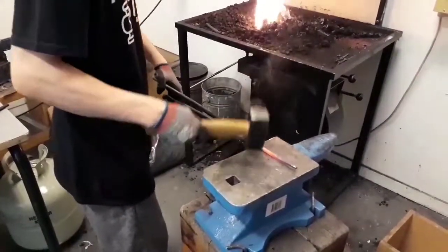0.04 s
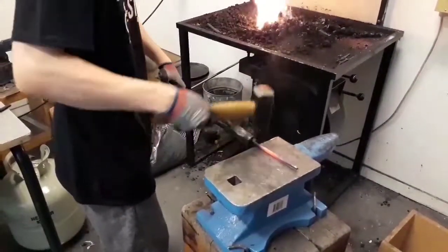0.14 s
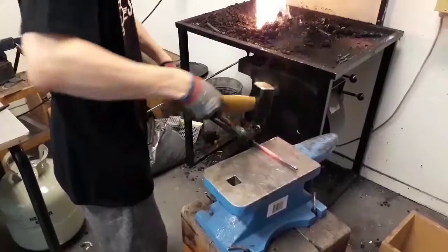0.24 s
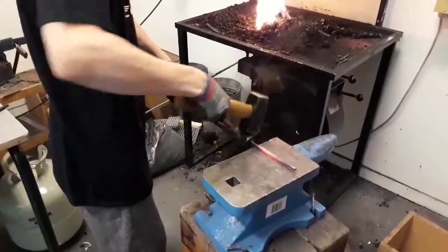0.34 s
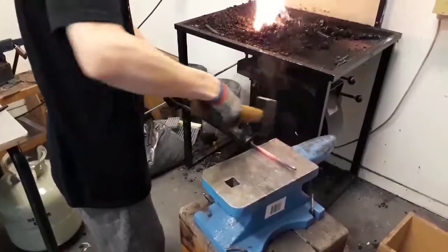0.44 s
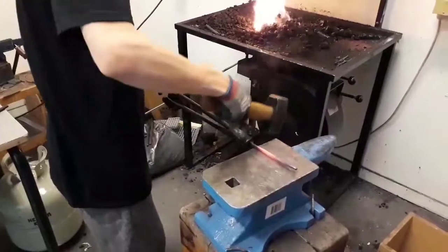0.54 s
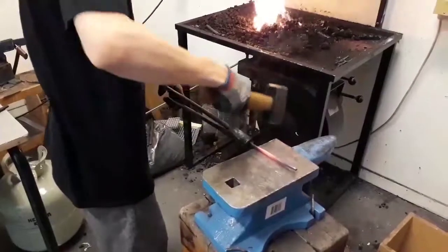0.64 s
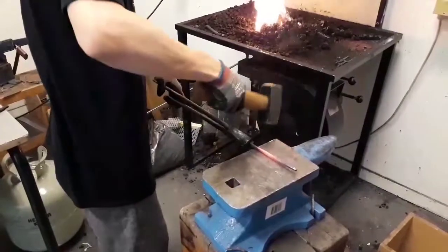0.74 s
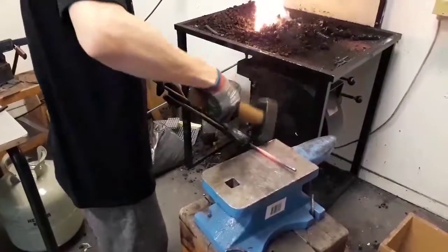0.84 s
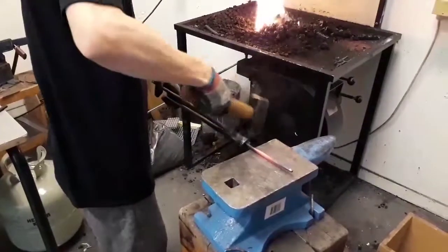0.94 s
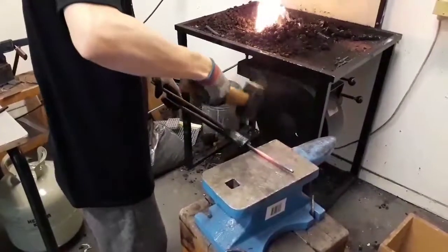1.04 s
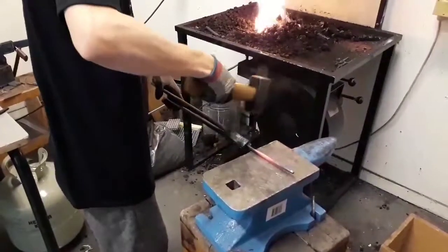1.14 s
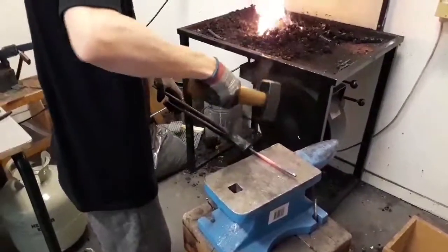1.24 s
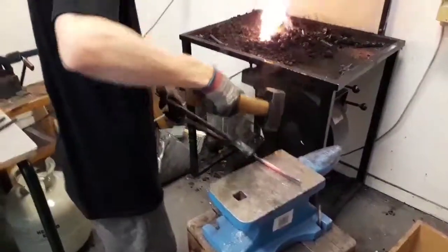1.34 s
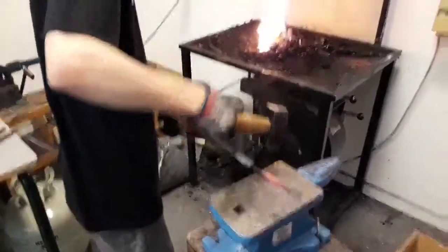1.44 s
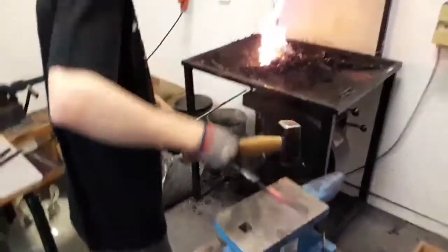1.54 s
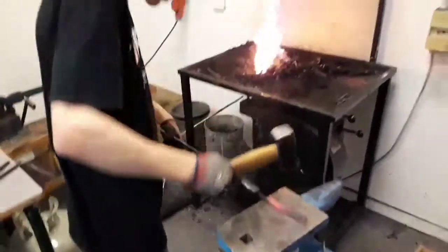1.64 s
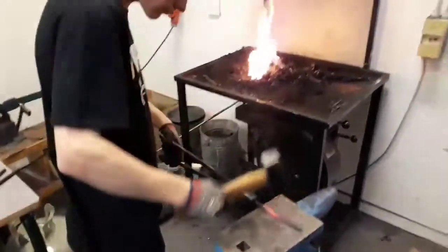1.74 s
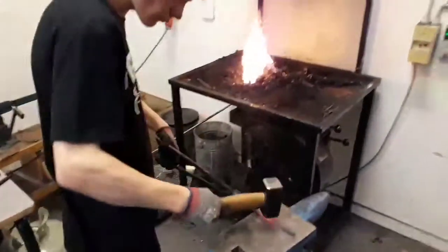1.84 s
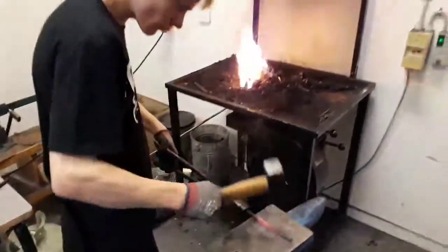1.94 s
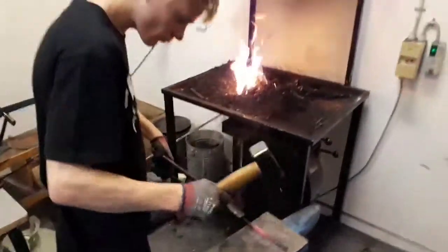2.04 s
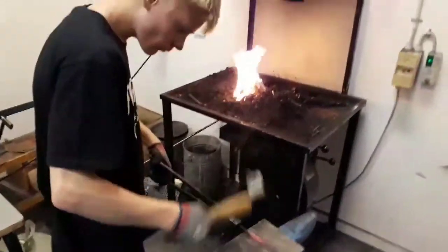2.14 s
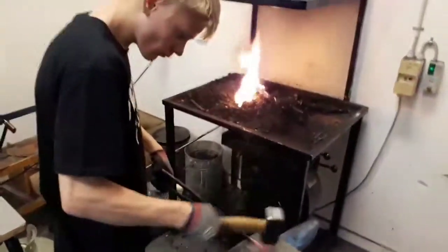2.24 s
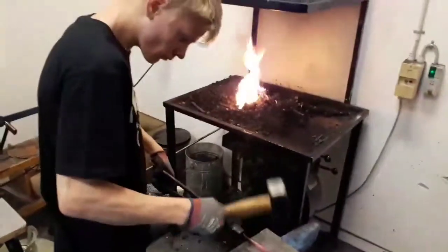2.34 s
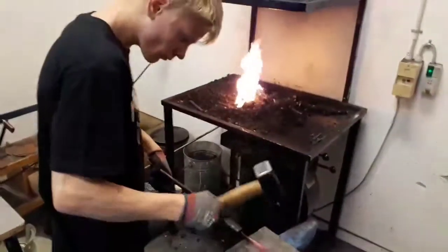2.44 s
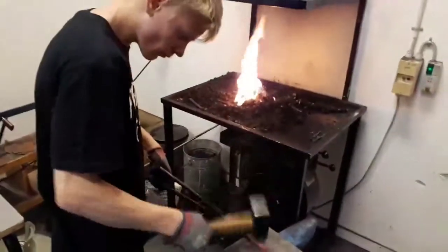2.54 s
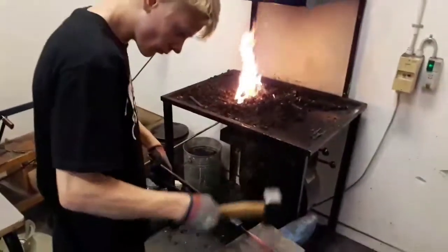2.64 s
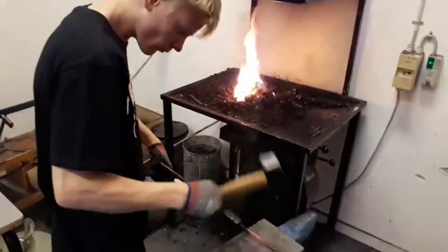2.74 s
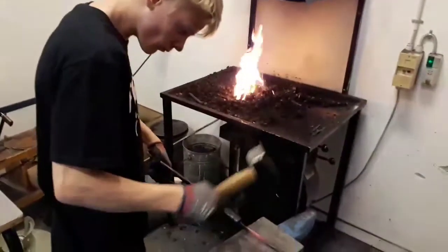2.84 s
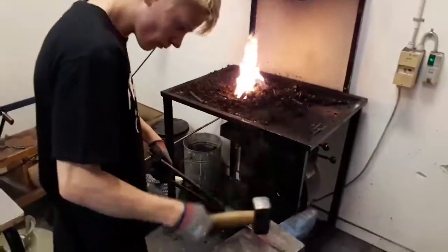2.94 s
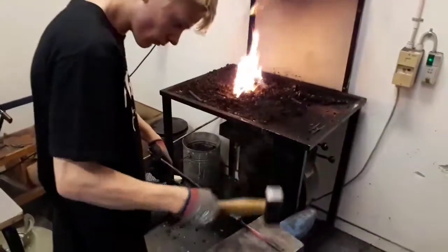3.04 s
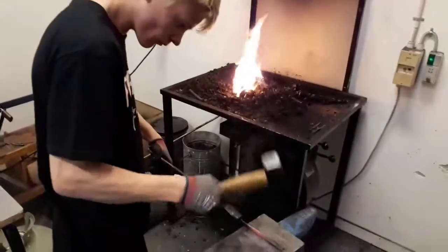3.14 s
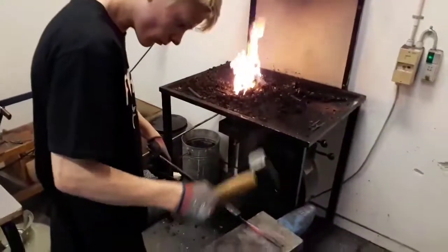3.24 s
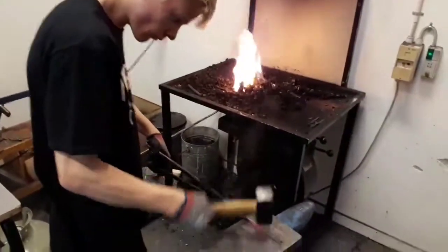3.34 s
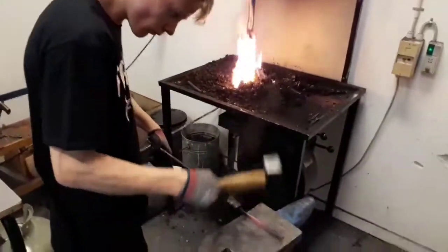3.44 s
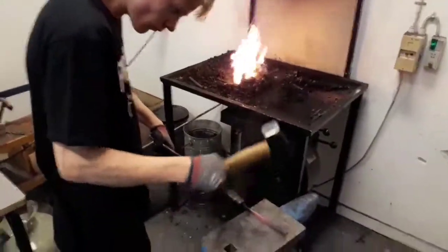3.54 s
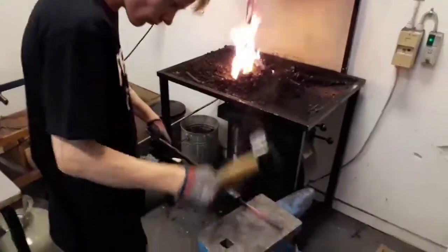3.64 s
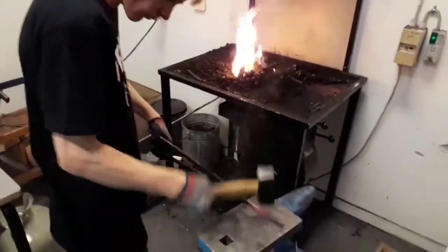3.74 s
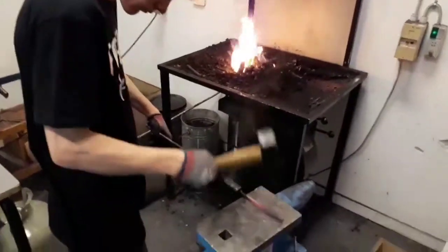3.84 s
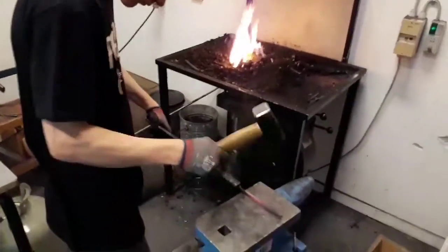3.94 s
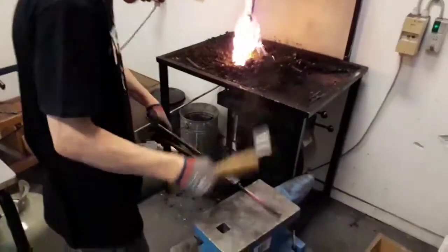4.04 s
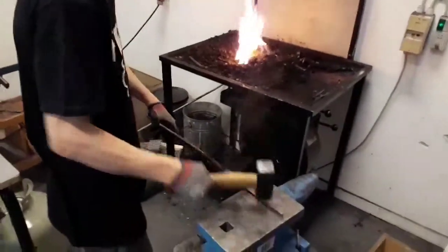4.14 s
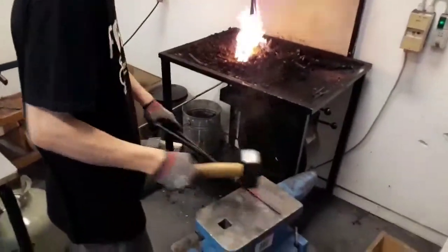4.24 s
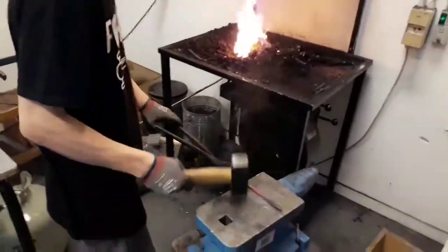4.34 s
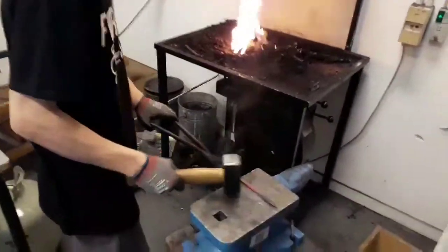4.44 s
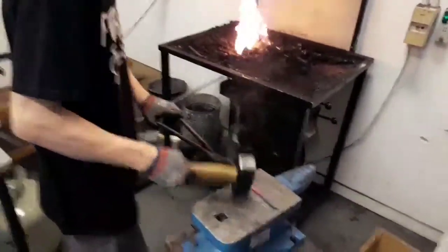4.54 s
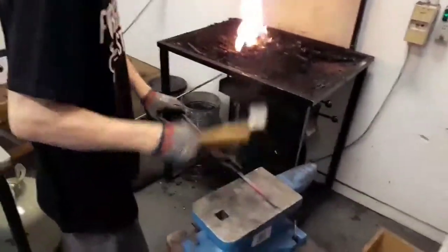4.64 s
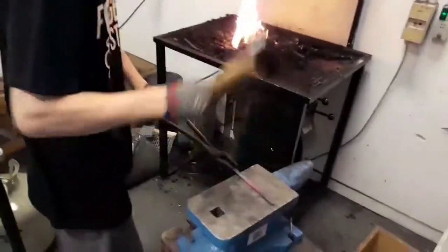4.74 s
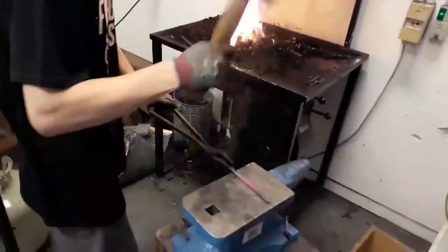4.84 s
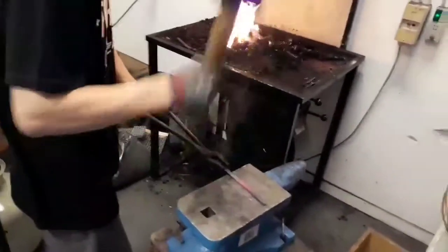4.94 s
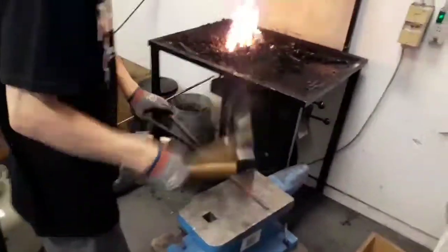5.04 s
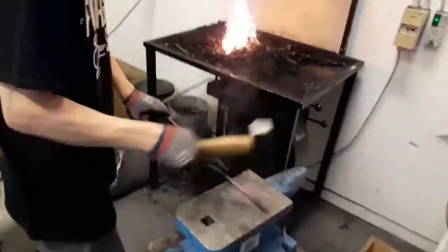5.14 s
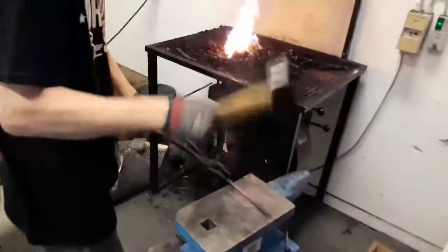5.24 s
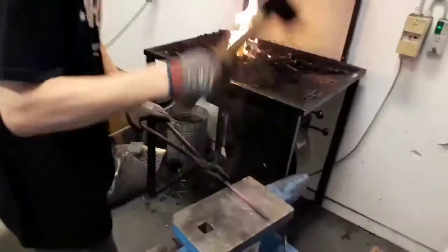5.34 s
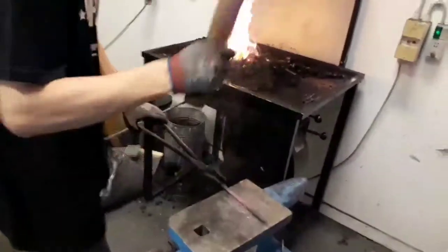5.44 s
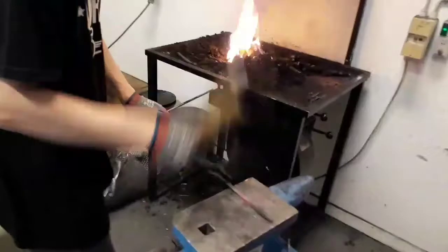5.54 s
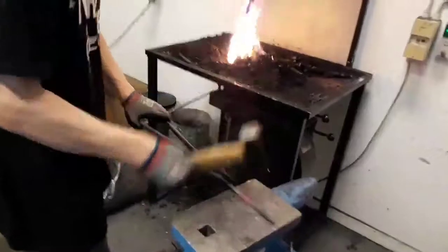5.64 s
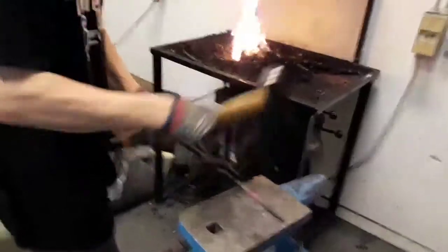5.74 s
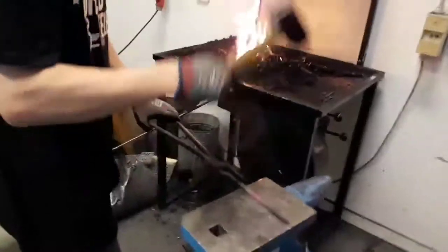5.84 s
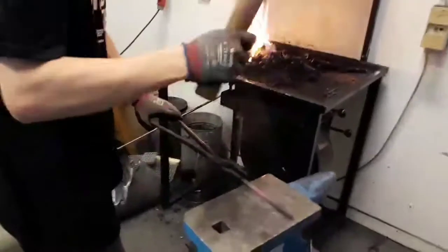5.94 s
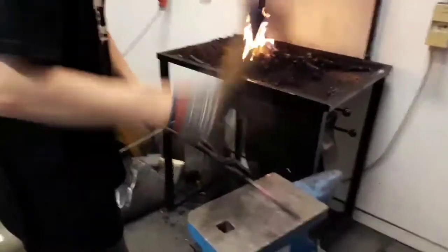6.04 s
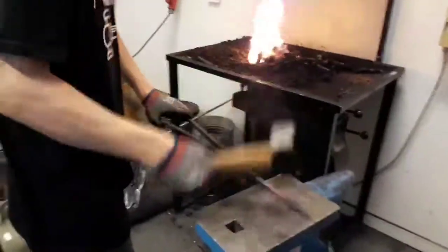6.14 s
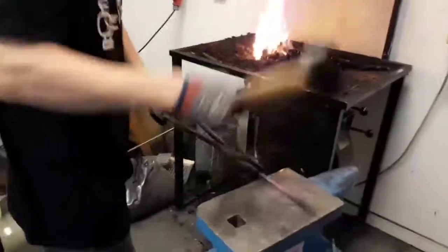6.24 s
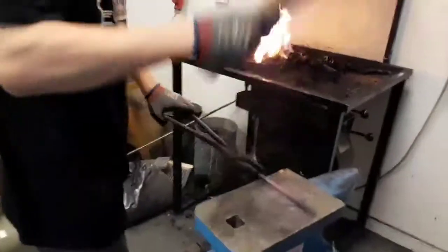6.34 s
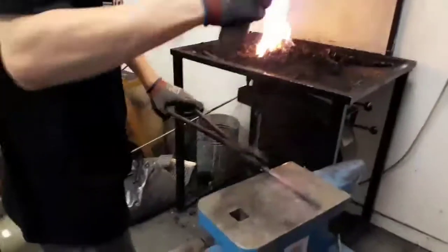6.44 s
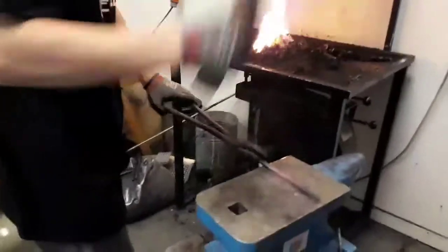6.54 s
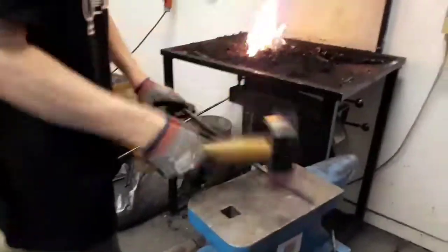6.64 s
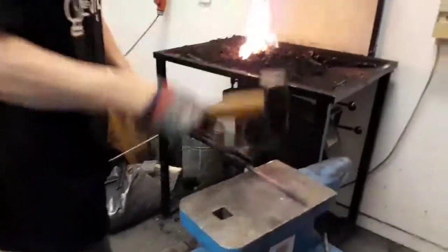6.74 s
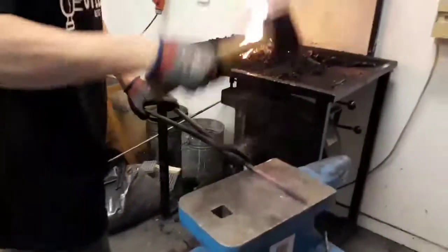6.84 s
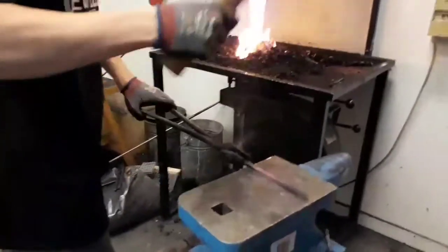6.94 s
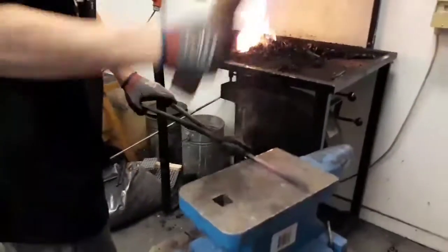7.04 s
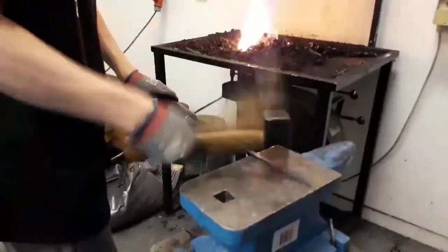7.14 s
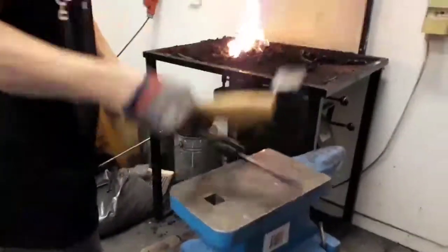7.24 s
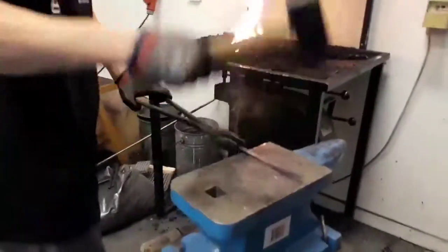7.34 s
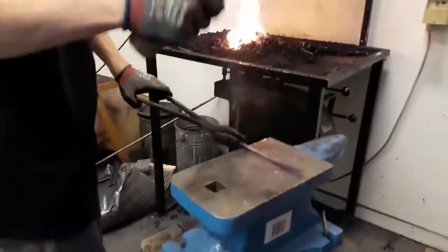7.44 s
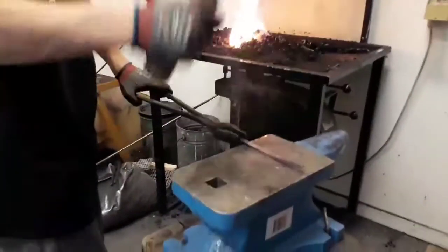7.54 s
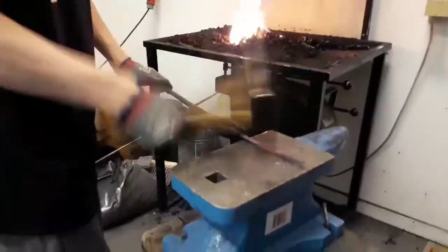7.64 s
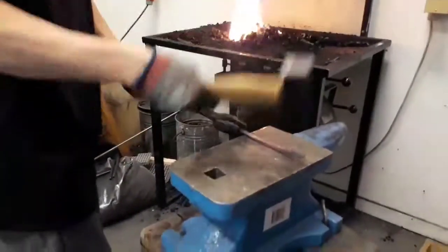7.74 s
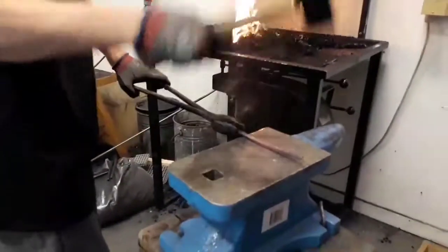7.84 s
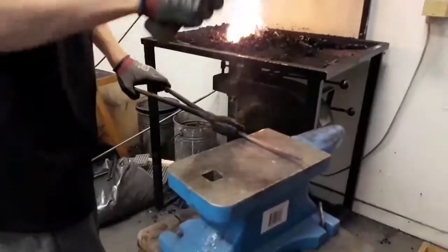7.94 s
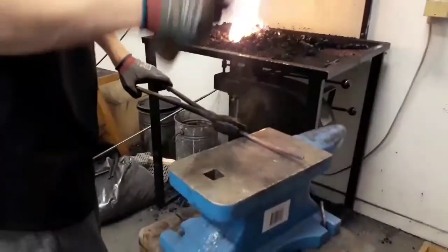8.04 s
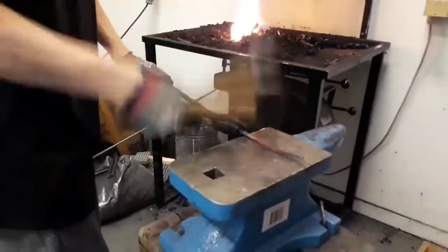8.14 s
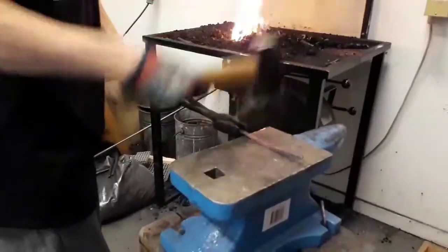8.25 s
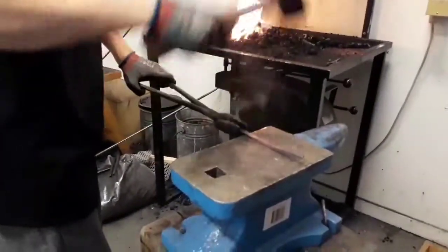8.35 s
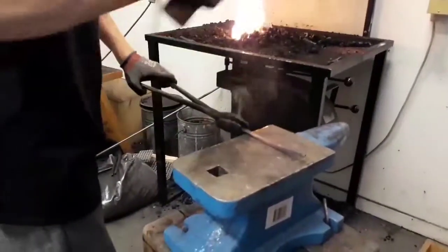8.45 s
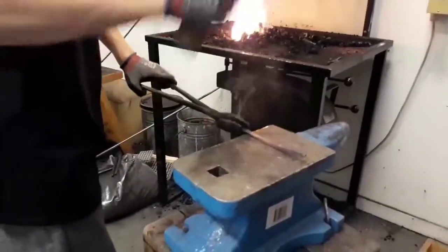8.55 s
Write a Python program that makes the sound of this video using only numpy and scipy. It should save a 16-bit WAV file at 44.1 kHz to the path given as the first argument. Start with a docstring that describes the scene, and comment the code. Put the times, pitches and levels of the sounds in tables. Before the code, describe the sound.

In a small hard-walled workshop, tongs click over a forge blower's hum, then a hammer strikes hot steel on an anvil in steady, strengthening blows.

```python
"""The tail of a hammer blow fades in a small hard-walled workshop; tongs click over a forge blower's hum.
Then a hand hammer strikes a hot bar on an anvil, blow after blow: noise that the room prolongs, with
short contact pulses, a thud from resonances of the stand and a ring from decaying anvil modes.
The blower is a mains tone, noise-driven housing resonances and air noise; a set curve, standing in for
a recorder's slow automatic gain, raises it in the pause and lowers it under the blows."""
import sys
import numpy as np
from scipy import signal
from scipy.io import wavfile

SR = 44100
rng = np.random.default_rng(int(sys.argv[2]) if len(sys.argv) > 2 else 0)


def to_wav(s):
    """Save 16-bit WAV."""
    ch = np.atleast_2d(s).T  # columns
    pcm = np.round(np.clip(ch, -1, 1) * 32767)  # PCM
    wavfile.write(sys.argv[1], SR, pcm.astype(np.int16))


N = 378819
LEAD = SR // 2   # run-in before the start, in samples

# Hammer blows. Each row: start in seconds, body level in relative dB, thud and brightness in dB over
# the body, snap of the first instant in dB, anvil ring in relative dB, landing spot along and across
# the face (about -1 to 1), level of the highest ring in relative dB.
HAMMER_BLOWS = [(-0.16, -12, -16.5, -32, 1.8, -33, -0.4, -0.97, -58),
                (1.9583, -22, 3, 2, 7.8, -35.5, 0.26, 0.29, -33),
                (2.3349, -12.5, -3.5, -7, 1, -30, 0.49, 0.1, -29.5),
                (2.7060, -12.5, -8, -9, 3, -32, 1, -0.58, -46),
                (3.0784, -11, -11, -12, 5.5, -30, 0.58, -0.54, -56),
                (3.4641, -15, -9.5, -8, 7.8, -35.5, 0.23, -0.065, -35.5),
                (3.8528, -11.5, -14, -9, 7.4, -36.5, 0.92, -0.55, -29),
                (4.2375, -8.5, -17, -16, 8.4, -35.5, 0.6, 0.041, -43),
                (4.5230, -20.5, -10.5, -20, 6.9, -37.5, -1.03, -1.27, -60),
                (5.1992, 0, -21.5, -16, 1.8, -26.5, -0.24, 0.5, -48),
                (5.7403, -1, -22, -18.5, 1.5, -27, -0.28, 0.26, -27),
                (6.264, -2, -20.5, -12, 0.53, -27.5, -0.52, -0.0065, -30),
                (6.782, -5, -17, -13.5, 1.8, -30, -0.26, 0.52, -30.5),
                (7.2942, -1, -22, -17.5, 1.1, -30.5, -0.45, 0.44, -26.5),
                (7.7941, -11, -10.5, -6, 2, -31, -0.072, 0.66, -37),
                (8.2964, -8, -15, -6, 1.5, -31.5, -0.38, 1, -30)]
# Reverberation of the workshop. Each row: frequency in Hz, time to fall 60 dB in seconds.
ROOM_DECAY = [(60, 1), (200, 0.65), (600, 0.93), (2000, 0.79), (5000, 0.65), (10000, 0.38), (13000, 0.2),
              (16000, 0.41)]


def from_db(db):
    """Level to amplitude: 20 dB is a factor of ten."""
    return 10 ** (np.asarray(db) / 20)


def rms_one(x):
    """Normalise the effective value: scale to rms 1."""
    return x / np.sqrt(np.mean(x ** 2) + 1e-20)


def at_hz(points, hz):
    """Interpolate a spectrum linearly on a logarithmic frequency axis."""
    point_hz, value = np.array(points).T
    return np.interp(np.log(hz), np.log(point_hz), value)


def strikes(times, db):
    """Impulsive excitation: one sample of the given level at each time in seconds."""
    out = np.zeros(N + LEAD) + 1e-18
    out[np.round(np.asarray(times) * SR).astype(int) + LEAD] = from_db(db)
    return out


def dying(clicks, t60):
    """Exponential decay: each click starts an envelope that falls 60 dB in t60 seconds."""
    return signal.lfilter([1], [1, -from_db(-60 / (t60 * SR))], clicks)


def resonance(x, hz, width_hz):
    """Damped resonator: a pole pair whose bandwidth sets its decay, with gain 1 at the peak."""
    r = np.exp(-np.pi * width_hz / SR)
    feedback = [1, -2 * r * np.cos(2 * np.pi * hz / SR), r * r]
    return signal.lfilter(np.array([1, 0, -1]) * (1 - r * r) / 2, feedback, x)


def noise_bands():
    """Third-octave analysis of white noise, as (centre Hz, samples); neighbours are unrelated."""
    edges = 30 * 2 ** np.arange(0, 9.3, 1 / 3)
    white = rng.standard_normal((2, N + LEAD))
    bands = []
    for k, (low, high) in enumerate(zip(edges, edges[1:])):
        band_pass = signal.butter(2, [low, high], "band", fs=SR, output="sos")
        bands.append((np.sqrt(low * high), signal.sosfilt(band_pass, white[k % 2])))
    return bands


def impact(bands, times, db_at, colour, early_db, early_t60, build_cycles=0.77):
    """Room response to an impact: strong first reflections and a tail whose decay depends on frequency."""
    out = 0
    for hz, band in bands:
        level_db = db_at(hz) + at_hz(colour, hz)
        late = strikes(times, level_db)
        early = strikes(times, level_db + early_db)
        decay = dying(late, at_hz(ROOM_DECAY, hz)) + dying(early, early_t60)
        # The build-up lasts a fixed number of cycles, so lows take longer.
        out = out + band * (decay - dying(late + early, build_cycles / hz))
    return out


def crack(times, peak_db, hz):
    """Contact pulse: two or three cycles that swell and vanish, with peak 1 for 0 dB."""
    cycles = np.arange(int(3 * SR / hz)) * hz / SR
    swell = cycles * np.exp(1 - cycles / .8) / .8
    return signal.lfilter(np.sin(2 * np.pi * cycles) * swell, [1], strikes(times, peak_db))


def hardness():
    """Strength of impact read from the body level: 0 for a light blow, 1 for a full swing."""
    body_db = np.transpose(HAMMER_BLOWS)[1]
    return np.clip((body_db + 10) / 8, 0, 1)


def blower(bands):
    """Noise-driven resonance: a steady mains hum and wavering housing tones over broad air noise."""
    # Hum level, a set curve standing in for the recorder's slow automatic gain.
    # Each row: time in seconds, relative dB.
    gain_curve = [(0.0, -57.5), (0.69, -49), (1.29, -46), (2.05, -45), (2.68, -57), (3.11, -61),
                  (3.68, -63), (4.6, -59.5), (5.31, -56), (5.57, -61), (6.36, -62), (7.39, -62),
                  (8.59, -62.5)]
    # Air and flame spectrum. Each row: frequency in Hz, relative dB per Hz.
    air_spectrum = [(30, -53), (70, -59), (110, -12.5), (223, -4.5), (380, -18.5), (700, -15),
                    (1280, -16.5), (1450, -21.5), (2300, -21), (4500, -29.5), (7470, -29.5), (11000, -46),
                    (15200, -51), (16500, -60)]
    # Housing tones. Each row: frequency in Hz, width in Hz, relative dB.
    housing_modes = [(109, 13, -4), (218.9, 1.8, -3), (299.7, 5, -9.5), (428.5, 8, -9.5), (497, 8.5, -7),
                     (663, 12, -30), (730, 7.1, -6), (1072.4, 3.7, -7), (1203, 30, -3.5), (1315, 18, -6.5)]
    t = (np.arange(N + LEAD) - LEAD) / SR
    roar = rms_one(sum(from_db(at_hz(air_spectrum, hz)) * band for hz, band in bands))
    tones = 0
    for hz, width_hz, db in housing_modes:
        tone = resonance(rng.standard_normal(N + LEAD), hz, width_hz)
        tones = tones + from_db(db) * rms_one(tone)
    mains = np.sin(2 * np.pi * 100 * t)
    gain = from_db(np.interp(t, *np.transpose(gain_curve)))
    return gain * (from_db(5.0) * mains + tones + from_db(2) * roar)


def tongs(bands):
    """Light impact: tongs shifting on the face give bright contact pulses and a short noisy tail."""
    # Clicks. Each row: start in seconds, rattle in relative dB, low knock in dB over the rattle,
    # contact peak in dB, contact frequency in Hz.
    tong_clicks = [(0.489, -17.5, 3, -15, 4100), (1.008, -28, 11, -34, 9000), (1.017, -45.5, 38, -29, 1230),
                   (1.047, -20.5, -21, -19, 7360), (1.532, -26.5, -19, -31, 8900)]
    # Click spectrum. Each row: frequency in Hz, relative dB per Hz.
    click_spectrum = [(150, -14), (400, -22), (1200, -10), (2100, -5), (4000, -11.5), (8000, -1.5),
                      (11000, -12.5), (16000, -15)]
    s, rattle, knock = np.transpose(tong_clicks)[:3]

    def shade(hz):
        """Spectral balance: the knock counts fully below 500 Hz and hardly above 2500 Hz."""
        return rattle + at_hz([(500, 1), (2500, 0.01)], hz) * knock

    contacts = sum(crack([at], peak_db, hz) for at, _, _, peak_db, hz in tong_clicks)
    return from_db(-13.5) * impact(bands, s, shade, click_spectrum, early_db=7, early_t60=.07) + contacts


def stand(thud_t60=0.7, push_db=28):
    """Forced vibration: each blow's push and decaying rumble drive the low stand and room modes."""
    # Modes. Each row: frequency in Hz, width in Hz, relative dB.
    low_modes = [(143, 14, -7), (174.4, 11.6, -3.5), (199, 7, -9), (271, 33, -9), (315, 17, -7.5),
                 (369, 16, -16), (485.6, 6.9, -9.5), (804, 74, -15)]
    s, body, thud = np.transpose(HAMMER_BLOWS)[:3]
    rumble = dying(strikes(s, body + thud), thud_t60) * rng.standard_normal(N + LEAD)
    drive = rumble + strikes(s, body + thud + push_db)
    return from_db(17.5) * sum(from_db(db) * resonance(drive, hz, width_hz) for hz, width_hz, db in low_modes)


def anvil(echo_db=19.5, echo_width_hz=26, clang_db=17.5, clang_width_hz=70):
    """Modal ringing: struck modes decay; their room echoes waver as lines, wider after hard blows."""
    # Mode families, one list each. Each row: frequency in Hz, relative dB, own 60 dB decay in seconds.
    mode_families = [
        [(1720, 0, .24), (1453, -14, .15)],
        [(1846, -5, .17), (1900, -3, .2), (1975, -6, .17), (2092, -9, .17)],
        [(2837, 0, .26)],
        [(3274, 0, .22), (4570, -2, .15), (10940, -25, .15)],
        [(4150, 0, .28), (3691, -4, .26), (9178, -15, .18), (6064, -19, .15), (7115, -17, .17),
         (9700, -23, .14)],
        [(4240, 0, .2), (4330, -6, .15), (4965, -11, .18), (5528, -13, .25), (9380, -22, .14)],
        [(6328, -9, .16), (6435, -6, .18), (6558, -6, .18), (6915, -7, .16), (7447, -6, .18), (8055, -5, .16),
         (13410, -17, .12)],
        [(11665, -6, .3)],
    ]
    # Share of the ring by landing spot, for the first seven families. Each row: relative dB at mid-face,
    # dB per step along the face, dB per step across it.
    spot_shares = [(4, 6, 2.7), (3.5, -0.7, -2.5), (0.05, 8, 3), (-1.1, -6, 1.7), (1.3, -4.5, -4),
                   (-5, -24, 6.5), (-1.5, 2.1, -6)]
    white = rng.standard_normal((3, N + LEAD))   # dealt to the modes in turn
    s, hard = np.transpose(HAMMER_BLOWS)[0], hardness()
    ring_db, along, across, highest_db = np.transpose(HAMMER_BLOWS)[5:]
    levels_db = [ring_db + mid_db + along_db * along + across_db * across
                 for mid_db, along_db, across_db in spot_shares] + [highest_db]
    # Hard blows press the bar down: less clean ring, and a larger share of the echo clangs.
    clang_share = strikes(s, np.log10(0.05 + 0.43 * hard) * 20)
    out = 0
    for family_db, modes in zip(levels_db, mode_families):
        for k, (hz, level_db, t60) in enumerate(modes):
            struck_db = family_db + level_db + rng.normal(0, 0.95, len(s))
            r, w = from_db(-60 / (t60 * SR)), 2 * np.pi * hz / SR
            clean = strikes(s, struck_db - 5 * hard)
            ring = signal.lfilter([0, np.sin(w)], [1, -2 * r * np.cos(w), r * r], clean)
            struck, noise = strikes(s, struck_db), white[k % len(white)]
            room_t60 = at_hz(ROOM_DECAY, hz)
            echoes = dying(struck * (1 - clang_share), room_t60) * noise
            clang = dying(struck * clang_share, room_t60) * noise
            out = out + rng.choice([-1, 1]) * ring
            out = out + from_db(echo_db) * resonance(echoes, hz, echo_width_hz)
            out = out + from_db(clang_db) * resonance(clang, hz, clang_width_hz)
    return from_db(2.0) * out


def blows(bands):
    """Impact on the bar: a dull body, with contact pulses that are shorter when the blow is harder."""
    # Body spectrum. Each row: frequency in Hz, relative dB per Hz.
    body_spectrum = [(35, -49), (60, -19), (165, -1.5), (1030, -23), (1570, -9), (1690, -12), (2290, -19),
                     (2770, -18), (3040, -21), (4220, -17), (5870, -13.5), (7780, -2), (11900, -36),
                     (15400, -16), (16500, -65)]
    s, body, thud, top, snap_db = np.transpose(HAMMER_BLOWS)[:5]
    hard = hardness()
    treble = top + np.interp(hard, [0, 1], [-7, 4])   # 6-8 kHz, dB: light to hard
    # Tick peak, dB: light to hard, plus 2 dB per dB of snap.
    tick_db = np.interp(hard, [0, 1], [-29, -15]) + 2 * snap_db

    def shade(hz):
        """Spectral balance: thud weighs on the lows, treble near 6-8 kHz, brightness above."""
        low_part = at_hz([(300, 0.84), (700, 0.38)], hz) * thud
        top_part = at_hz([(8000, 0.17), (9500, 1.0)], hz) * top
        treble_part = at_hz([(4000, 0.027), (6000, 1.0), (8000, 0.81), (9500, 0)], hz) * treble
        return body + low_part + top_part + treble_part

    light = hard < .4
    thumps = crack(s[light], tick_db[light], hz=1780)
    ticks = crack(s[~light], tick_db[~light], hz=2900)
    snaps = crack(s, body + top + snap_db - 9, hz=11900)
    dull = from_db(10.0) * impact(bands, s, shade, body_spectrum, snap_db, early_t60=0.032)
    return dull + thumps + ticks + snaps


def scene():
    """Superposition: the pressures of all sources add at one microphone."""
    bands = noise_bands()
    mix = blower(bands) + tongs(bands) + stand() + anvil() + blows(bands)
    return mix[None, LEAD:]


def record(dry):
    """Transducer response: a small microphone loses deep bass, dips in the treble and rounds peaks."""
    # Microphone port dips. Each row: frequency in Hz, width in Hz, depth from 0 to 1.
    port_dips = [(6200, 1830, 0.46), (8970, 1980, 0.47)]
    thin = signal.sosfilt(signal.butter(2, 65, "high", fs=SR, output="sos"), dry)
    for hz, width_hz, depth in port_dips:
        thin = thin - depth * resonance(thin, hz, width_hz)
    rounded = .8 * np.tanh(thin / .8)
    # The top is cut by 50 dB from 16.8 kHz up.
    return signal.sosfilt(signal.cheby2(10, 50, 16800, fs=SR, output="sos"), rounded)


dry = scene()
out = record(dry)
to_wav(out)
```